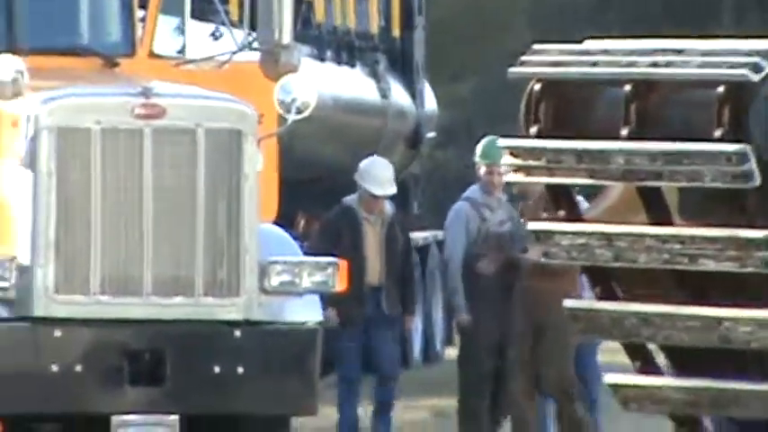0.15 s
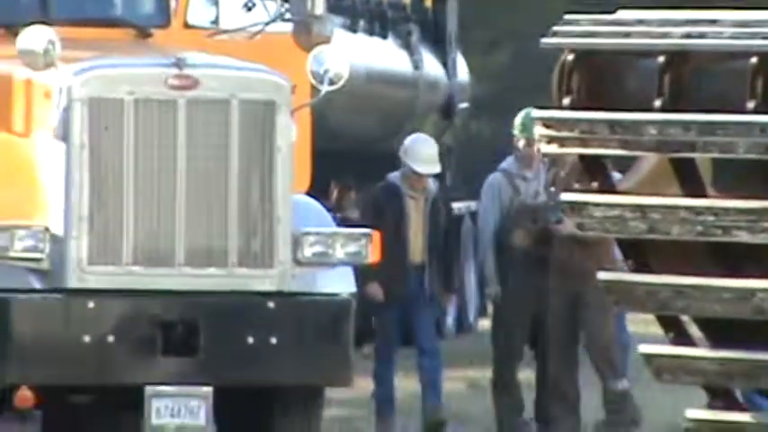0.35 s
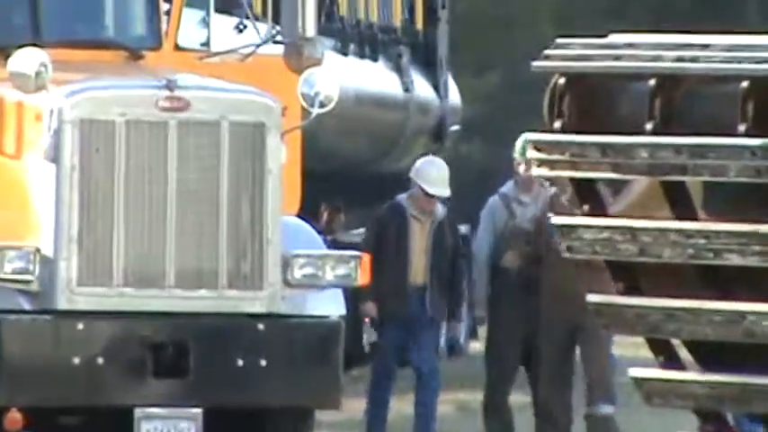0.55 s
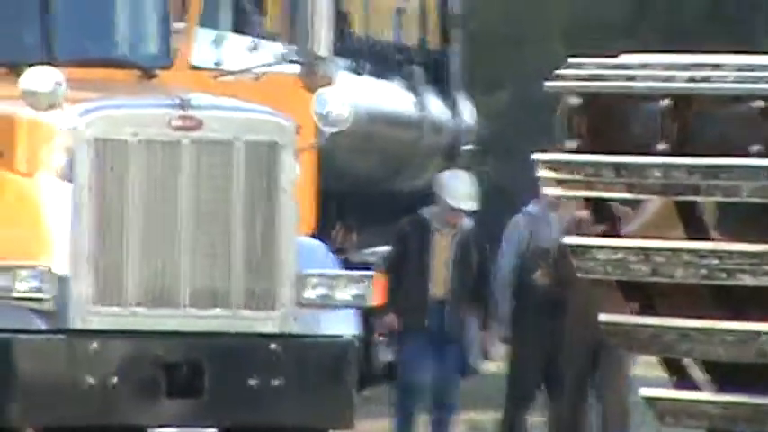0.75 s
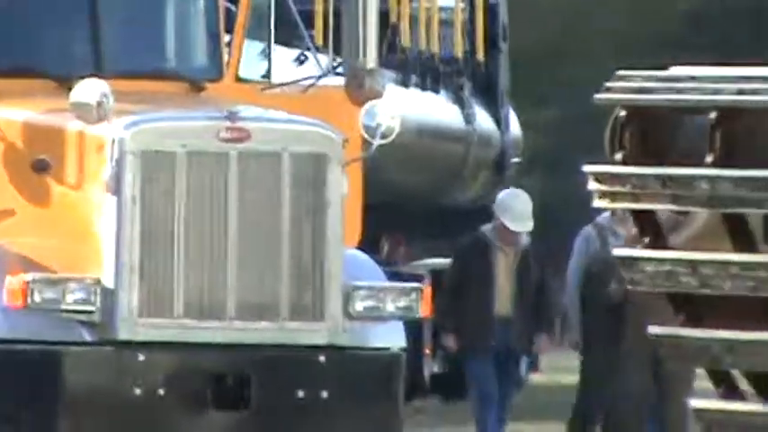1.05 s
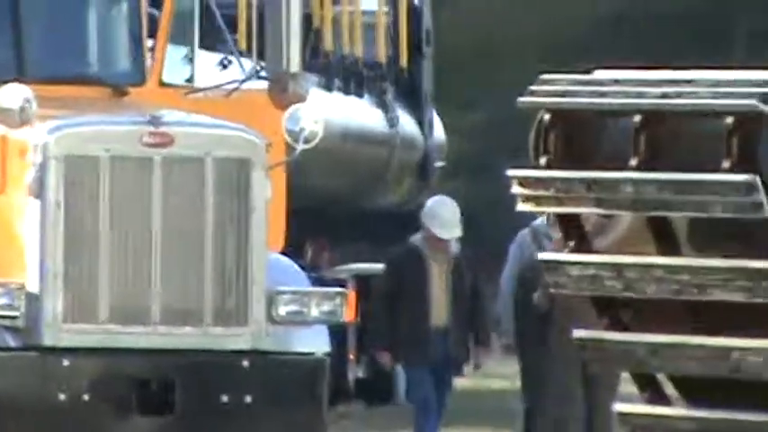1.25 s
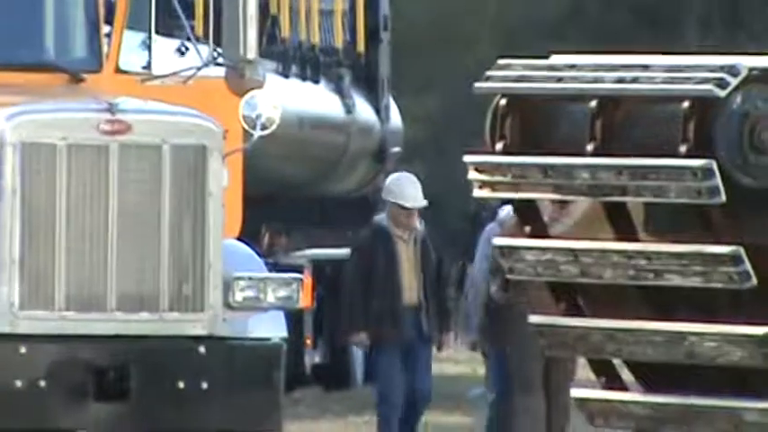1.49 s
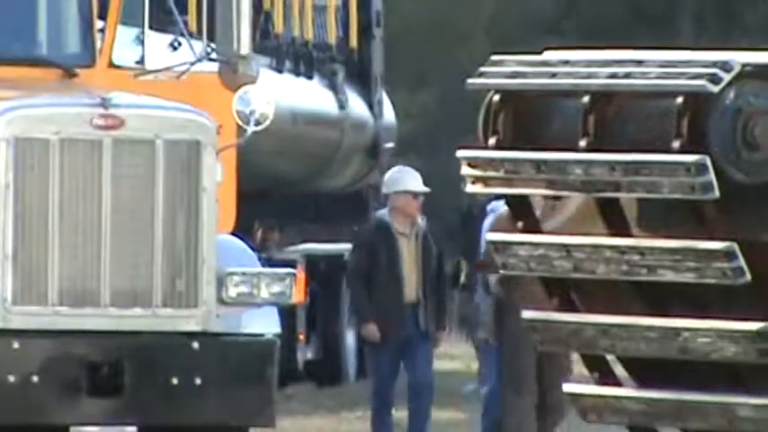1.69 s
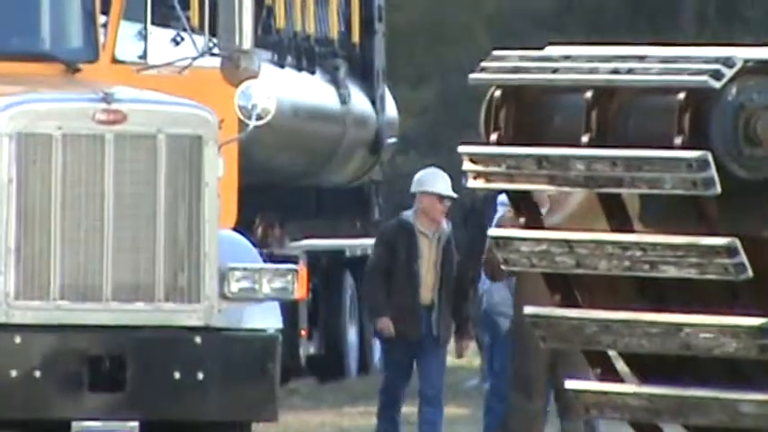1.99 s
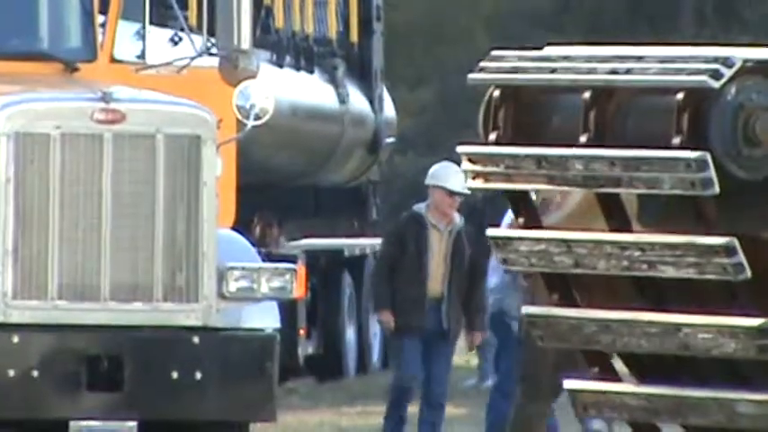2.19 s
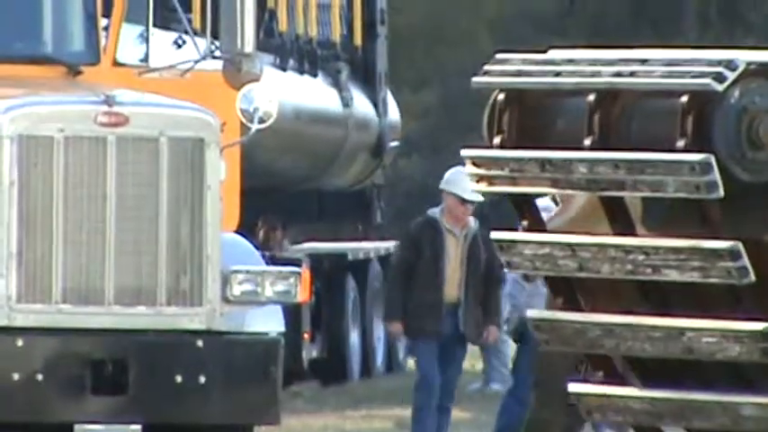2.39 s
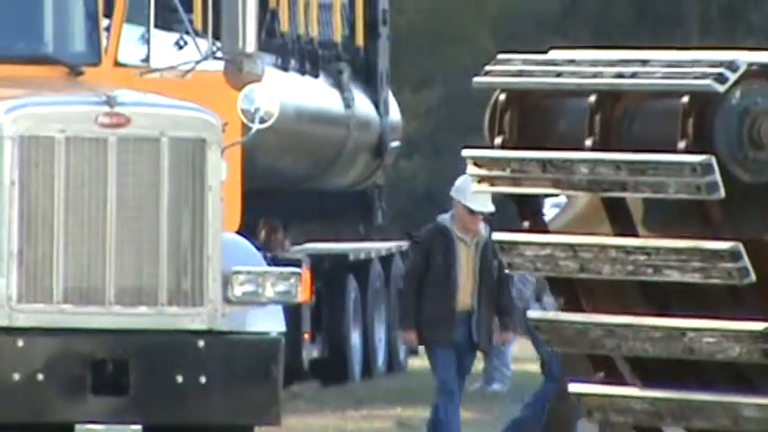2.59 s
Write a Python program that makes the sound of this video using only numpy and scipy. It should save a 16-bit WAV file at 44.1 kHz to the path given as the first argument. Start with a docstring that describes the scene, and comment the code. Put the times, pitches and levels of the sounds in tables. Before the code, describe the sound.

Outdoors at a work site, a big truck's diesel engine idles steadily slightly to the left, pulsing and rumbling under light rattle and thin machinery whines. A soft hiss rises briefly, then dies away just after a faint tick.

```python
"""A boomy throb comes from a little to the left: a heavy diesel idling outdoors at a work site.
The uneven firings of one cylinder bank pulse through the exhaust, sounding harmonics of the engine
cycle over a rumble of rough gas flow. Above them sit combustion clatter, thin machinery whines and
a hiss of air. A soft extra hiss swells in the first second and fades just after a faint tick."""
import sys
import numpy as np
from scipy import signal
from scipy.fft import rfft, irfft
from scipy.io import wavfile

SR = 44100
rng = np.random.default_rng(int(sys.argv[2]) if len(sys.argv) > 2 else 0)


def dump(signal):
    """Clip the signal to [-1, 1] and save it as 16-bit WAV at the path in sys.argv[1]."""
    limited = np.clip(np.atleast_2d(signal).T, -1, 1)
    pcm = np.round(limited * 32767).astype(np.int16)
    wavfile.write(sys.argv[1], SR, pcm)


N = 120834

IDLE_CYCLE_HZ = 873 / 120  # 873 rpm; a four-stroke cycle takes two revolutions
# The stereo image. Each row: frequency in Hz, left-right coherence, left minus right in dB.
STEREO_IMAGE = [(60, .97, 1.8), (100, .97, 1.8), (170, .9, -.8), (260, .75, .4), (450, .75, 2.2),
                (750, .68, 4), (1200, .88, 2.3), (2200, .93, 1.3), (5000, .88, .5), (8500, .68, .3),
                (13000, .92, .2)]


def exhaust(cycle):
    """Periodic gas pulses form a harmonic series; firing order and pipe resonances set the phases."""
    # Each row: harmonic number of the engine cycle, relative level in dB.
    harmonics = [(5, -36.3), (6, -52), (7, -54), (8, -28.4), (11, -15), (13, -39), (14, -41), (15, -40.4),
                 (16, -38.7), (17, -47.3), (18, -49.6), (19, -45.6), (20, -53), (21, -40.4), (22, -47),
                 (24, -29.3), (27, -50.6), (30, -55), (35, -52), (36, -52.5), (38, -56.7), (44, -43.5)]
    # Which of the eight firings go into this pipe.
    bank_slots = [0, 2, 3, 5]
    # Each row: resonance frequency in Hz, half width in Hz, gain in dB.
    pipe_modes = [(80, 4, 0), (174, 5, -14), (321, 5, -30)]
    lag_s = np.array([[0], [.00021]])  # the sound arrives later on the right
    throb = 0
    for k, db in harmonics:
        hz = k * IDLE_CYCLE_HZ
        firings = np.exp(-2j * np.pi * k * np.array(bank_slots) / 8).sum() + 1e-6
        pipe = sum(from_db(gain) / (1 + 1j * (hz - centre) / width) for centre, width, gain in pipe_modes)
        phase = 2 * np.pi * (k * cycle - hz * lag_s) + np.angle(firings * pipe)
        throb += from_db(db) * np.sqrt(2) * np.cos(phase) * pan(at_hz(STEREO_IMAGE, hz, column=2))
    unevenness = from_db(.03 + .25 * drift(rate_hz=6))  # firings differ in strength
    return throb * lope(cycle) * unevenness


def lope(cycle):
    """Amplitude modulation: the exhaust swells once a revolution and once a cycle."""
    # Each row: swells per cycle, depth, crank position of a swell in cycles.
    swells = [(1, .07, .07), (2, .11, .2)]
    return 1 + sum(depth * np.cos(2 * np.pi * k * (cycle - at)) for k, depth, at in swells)


def gas_rumble():
    """Turbulence: rough gas flow in the pipe makes low broadband noise."""
    # Each row: frequency in Hz, relative spectral density in dB.
    spectrum = [(15, -28.5), (32, -13.5), (58, -6), (80, -2.5), (100, -10), (140, -9), (168, -5.5),
                (200, -11.5), (260, -15.5), (340, -19), (450, -32)]
    return from_db(-31.5) * noise(spectrum)


def clatter(cycle):
    """Impact excitation: each firing knocks block and valve gear; part of the rattle recurs every cycle."""
    # Each row: frequency in Hz, relative spectral density in dB.
    spectrum = [(250, -9), (380, 0.5), (500, 2.5), (700, -1.5), (900, -2.5), (1350, -4.5), (1750, -.5),
                (2000, -2.5), (2130, -10.5), (2370, -5.5), (2620, -9), (2780, -9.5), (3300, -13.5),
                (4000, -27), (5000, -32)]
    # Each row: time in seconds, relative level in dB.
    envelope = [(0.02, -40.5), (0.18, -42), (0.2, -41.5), (0.48, -42), (2.62, -41), (2.7, -40)]
    repeat_share, knock_decay = .25, .35  # share of the power; decay in firing intervals
    cycle_samples = int(SR / IDLE_CYCLE_HZ)
    fresh, pattern = rng.standard_normal((2, 2, N))
    recurring = pattern[:, (cycle % 1 * cycle_samples).astype(int)]
    rattle = np.sqrt(repeat_share) * recurring + np.sqrt(1 - repeat_share) * fresh
    since_firing = 8 * cycle % 1
    knocks = 1 + .18 * np.exp(-since_firing / knock_decay)
    level_db = 1 + in_time(envelope) + .5 * drift(rate_hz=7.9)
    return from_db(level_db) * colour(rattle * knocks, spectrum)


def whines():
    """Random modulation of amplitude and phase spreads each steady machinery tone into a narrow band."""
    # Each row: frequency in Hz, rms level in dB before panning, flutter depth.
    tones = [(461, -55, 1.2), (573, -57, 1.2), (634, -59, 1.2), (816, -58, .7), (1238, -62, .8),
             (1330, -64, .9), (1505, -54.5, .4), (1776, -60, .9), (1981, -59.5, .6), (2746, -62, .6),
             (2800, -67, .7), (5890, -76, 3)]
    seconds, out = np.arange(N) / SR, 0
    for hz, db, depth in tones:
        flutter = 1 + depth * (drift(rate_hz=9) + 1j * drift(rate_hz=9))
        carrier = np.exp(2j * np.pi * hz * seconds)
        out += from_db(db) * rms_one(np.real(flutter * carrier))
    return out * pan(db=3.5)


def air_hiss(cycle):
    """Amplitude-modulated noise: the hiss of air pulses lightly three times a revolution."""
    # Each row: frequency in Hz, relative spectral density in dB.
    spectrum = [(2500, -2), (4000, 2.5), (5100, -4.5), (6000, 0.5), (6600, -3.5), (7150, -3.5),
                (7650, -14.5), (8800, -12), (9500, -17), (12000, -22.5)]
    # Each row: time in seconds, relative level in dB.
    envelope = [(0.02, -57.5), (0.27, -62), (0.53, -57), (1.19, -62.5), (2.24, -59), (2.27, -61),
                (2.7, -57.5)]
    pulsing = 1 + .16 * np.cos(2 * np.pi * 6 * cycle)
    return from_db(3.5 + in_time(envelope)) * pulsing * noise(spectrum)


def hiss_swell():
    """A noise band near 4 kHz swells and fades under a slow envelope."""
    # Each row: frequency in Hz, relative spectral density in dB.
    spectrum = [(2800, -20.5), (3600, -1.5), (4100, 5.5), (4800, -4.5), (5600, -12), (7000, -13),
                (10000, -26)]
    # Each row: time in seconds, level in dB.
    envelope = [(0, -85), (.24, -64), (.35, -59), (.7, -58), (.89, -58.5), (.99, -78.5), (1.2, -89)]
    return from_db(in_time(envelope)) * noise(spectrum)


def tick():
    """A transient: bright noise with a sudden onset and exponential decay is heard as one faint tick."""
    # Each row: frequency in Hz, relative spectral density in dB.
    spectrum = [(1500, -7), (4000, -6), (7000, -1), (8000, -11), (11000, -11), (12000, -24)]
    start_s, decay_s = .835, .021
    age = np.arange(N) / SR - start_s
    envelope = (age > 0) * np.exp(-np.abs(age) / decay_s)
    return from_db(-53.5) * envelope * noise(spectrum)


def background_hiss():
    """Stationary noise lays a faint, even hiss behind everything."""
    # Each row: frequency in Hz, relative spectral density in dB.
    spectrum = [(4000, -0.12), (10000, 0.25), (15500, -1.5)]
    return from_db(-68) * noise(spectrum)


def colour(white, spectrum):
    """Spectral shaping: two white noises become partly coherent stereo noise of unit rms."""
    hz = np.fft.rfftfreq(N, 1 / SR)
    low_skirt = np.minimum(hz / spectrum[0][0], 1) ** 2
    high_skirt = np.maximum(hz / spectrum[-1][0], 1) ** -4
    gain = from_db(at_hz(spectrum, hz)) * low_skirt * high_skirt
    coherence = at_hz(STEREO_IMAGE, hz)
    balance = pan(at_hz(STEREO_IMAGE, hz, column=2))
    mid, side = rfft(white)
    stereo = np.sqrt(1 + coherence) * mid + np.sqrt(1 - coherence) * side * [[1], [-1]]
    return rms_one(irfft(stereo * gain * balance, N))


def noise(spectrum):
    """Gaussian stereo noise with this spectrum and unit rms."""
    return colour(rng.standard_normal((2, N)), spectrum)


def drift(rate_hz):
    """Low-pass filtered noise: a slow random fluctuation of unit rms."""
    hz = np.fft.rfftfreq(2 * N, 1 / SR)
    white = rfft(rng.standard_normal(2 * N))
    return rms_one(irfft(white / (1 + (hz / rate_hz) ** 2))[:N])


def from_db(db):
    """Decibels to amplitude ratio."""
    return 10 ** (np.asarray(db) / 20)


def rms_one(x):
    """Normalisation to unit rms."""
    return x / np.sqrt(np.mean(x ** 2) + 1e-20)


def in_time(rows):
    """Linear interpolation of a control curve at every sample."""
    return np.interp(np.arange(N) / SR, *np.transpose(rows))


def at_hz(rows, hz, column=1):
    """Interpolation of one table column on a log-frequency axis."""
    rows = np.array(rows)
    return np.interp(np.log(hz + 1e-9), np.log(rows[:, 0]), rows[:, column])


def pan(db):
    """Left and right gains for a level difference, the cue to direction."""
    return from_db(np.array([[.5], [-.5]]) * db)


def scene():
    """Superposition: the crank times exhaust, clatter and air; whines and hiss lie behind them."""
    # Each row: time in seconds, engine speed in revolutions per minute.
    engine_speed = [(0.0, 869.2), (0.17, 863.4), (0.36, 876.1), (0.6, 876.4), (1.13, 868.3), (1.36, 875.3),
                    (1.73, 870.3), (2.2, 876.8), (2.48, 886.9), (2.74, 877.0)]
    cycle = .836 + np.cumsum(in_time(engine_speed) / 120) / SR  # crank position in cycles
    engine = exhaust(cycle) + gas_rumble() + clatter(cycle) + air_hiss(cycle)
    return engine + whines() + hiss_swell() + tick() + background_hiss()


def record(dry):
    """An elliptic low-pass filter cuts the highest treble steeply."""
    cutoff_hz = 15800
    return signal.sosfilt(signal.ellip(10, .1, 80, cutoff_hz, fs=SR, output="sos"), dry)


dry = scene()
out = record(dry)
dump(out)
```